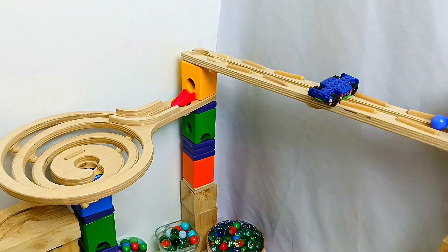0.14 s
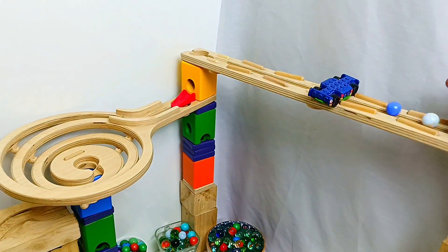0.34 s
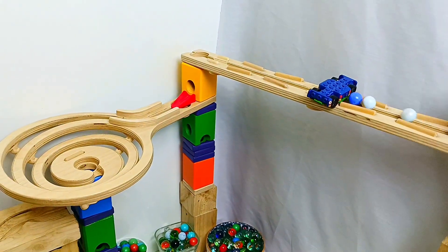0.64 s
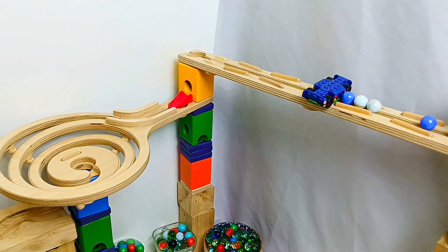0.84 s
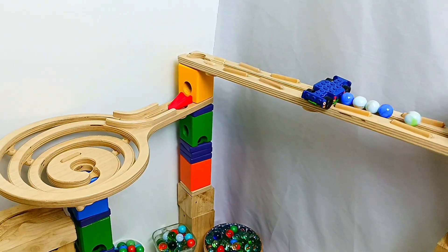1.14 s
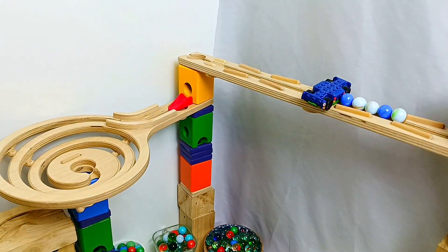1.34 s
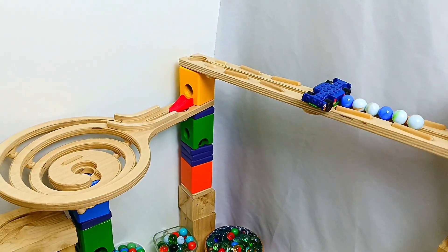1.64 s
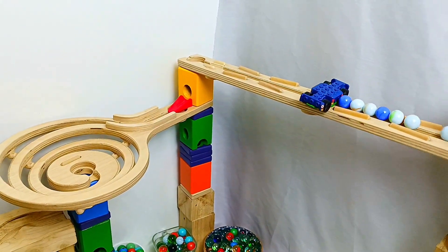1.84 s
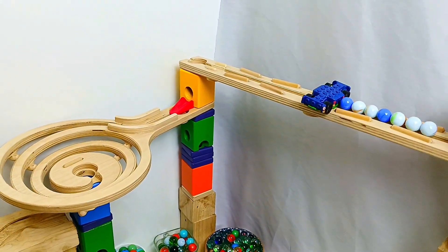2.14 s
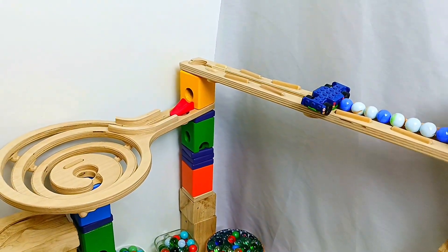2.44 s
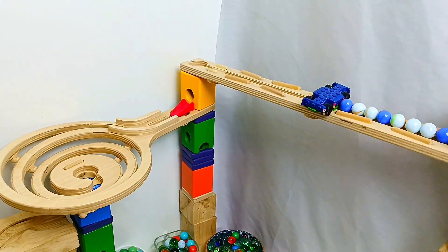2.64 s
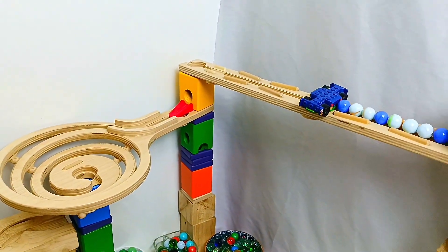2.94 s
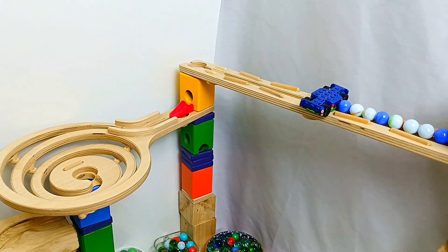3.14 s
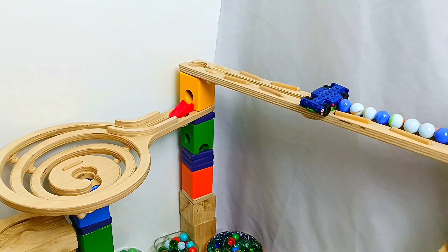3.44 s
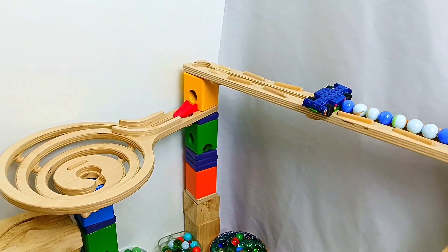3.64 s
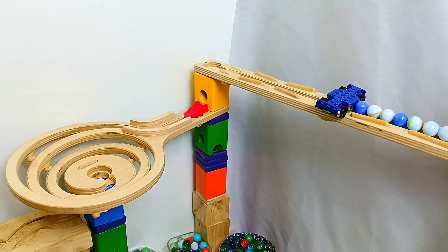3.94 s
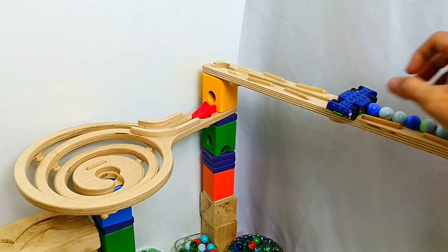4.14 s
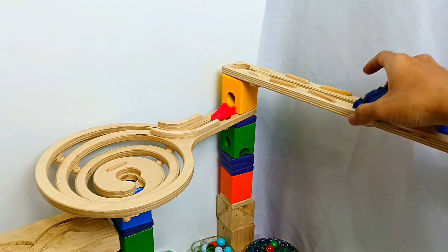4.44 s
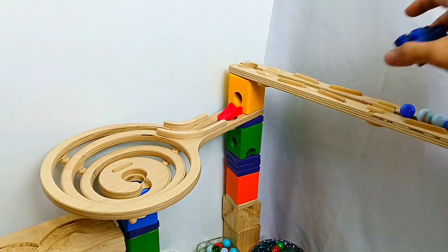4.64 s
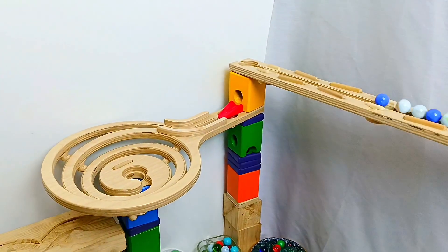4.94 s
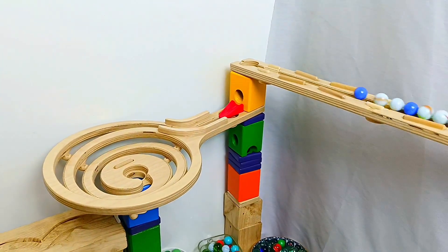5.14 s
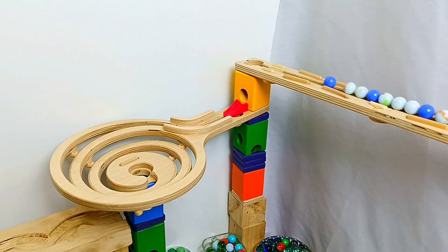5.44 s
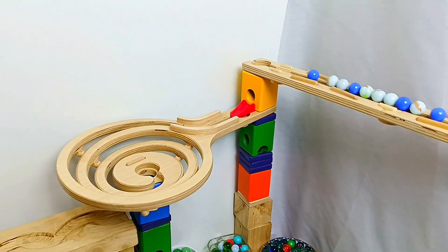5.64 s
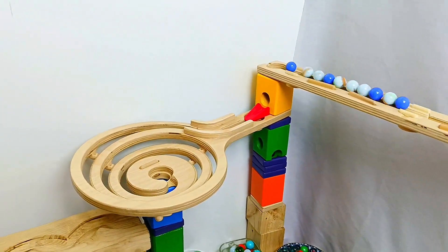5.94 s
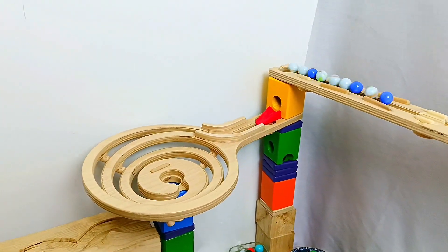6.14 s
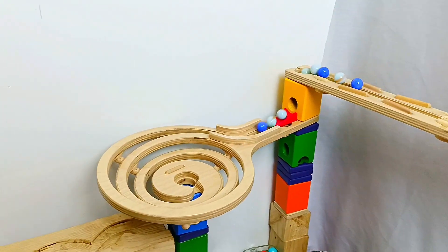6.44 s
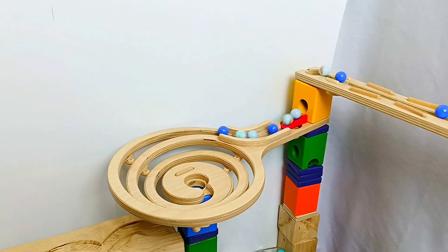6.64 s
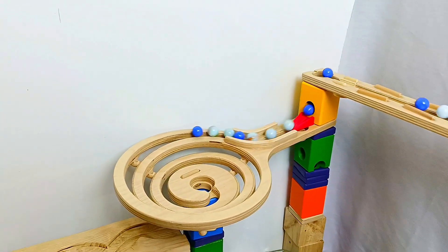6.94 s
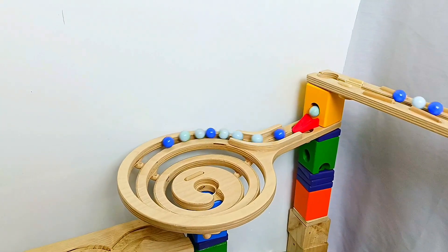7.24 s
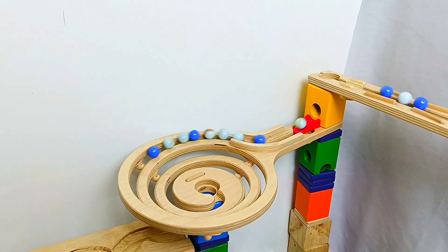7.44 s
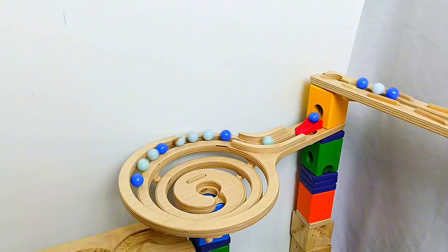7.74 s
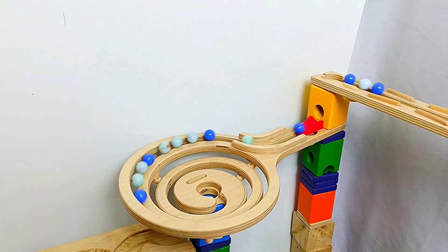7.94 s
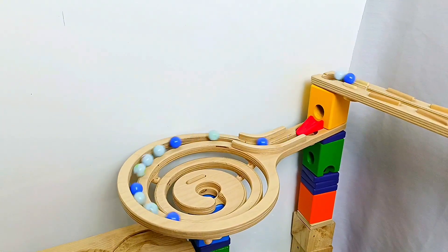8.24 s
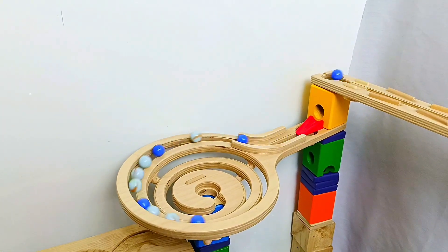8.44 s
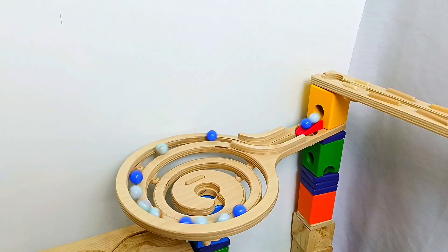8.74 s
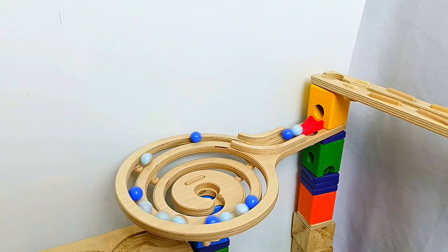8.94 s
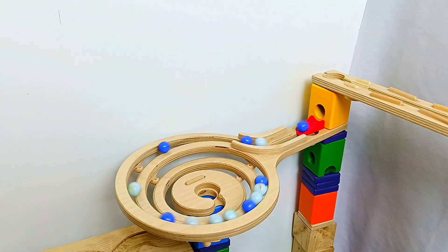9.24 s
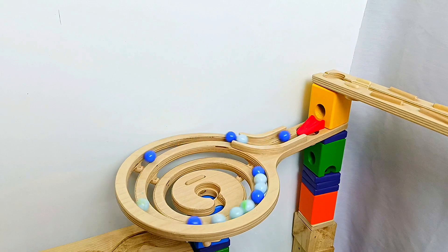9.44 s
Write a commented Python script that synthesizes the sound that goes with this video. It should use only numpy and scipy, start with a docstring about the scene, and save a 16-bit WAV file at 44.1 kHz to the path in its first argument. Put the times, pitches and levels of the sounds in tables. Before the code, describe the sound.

Marbles land, roll and clink together on wood, pause, tick away into a fast rattle, then slowed hollow knocks and a low rumbling roll.

```python
"""Marble run, real time and slow motion

A small room at two microphones, direct sound ahead of the echoes: glass marbles knock on a wooden track, roll
and click into a queue behind a toy car. Released, they tick over the seams and clatter down a plastic tower.
After a brief silence come slow, lower drops and a rumble round a wooden spiral, over a low beating hum.
Blows are noise cracks with damped rings; rolling is noise driven by tiny random bumps through resonances."""
import sys
import numpy as np
from scipy import signal
from scipy.fft import rfft, irfft, next_fast_len
from scipy.io import wavfile

SR = 44100
rng = np.random.default_rng(int(sys.argv[2]) if len(sys.argv) > 2 else 0)


def to_wav(s):
    """Save 16-bit WAV."""
    ch = np.atleast_2d(s).T  # columns
    pcm = np.round(np.clip(ch, -1, 1) * 32767)  # PCM
    wavfile.write(sys.argv[1], SR, pcm.astype(np.int16))


N = 423360
TIME = np.arange(N) / SR

# Levels of blows and rolling stand before the trim in each layer's function; ring pitches before random detuning.
# Positive left minus right means louder on the left.
CUT_S, RESUME_S, SLOW_SPEED = 6.606, 6.65, 0.42
TOP_HZ, SLOW_TOP_HZ = 16700, 6850
LEAD = 64  # samples ahead of each blow, trimmed off at the end
ATTACK_S = 0.0007  # blows multiply it by their speed

# Room air: (frequency [Hz], relative level per Hz [dB])
AIR = [(18, -53.5), (30, -13.5), (43, -26), (68, -12), (103, -6.5), (186, -22), (288, -19.5), (624, -22),
       (1930, -19.5), (3770, -35), (5690, -52), (14000, -49.5)]
AIR_DB = -65.5
# Hum, real time and slow motion: (time [s], level of the upper tone [dB])
HUM = [(0, -67), (1.4, -64), (2.6, -64), (2.95, -73.5), (3.8, -60.5), (5.3, -61), (5.7, -67.5),
       (6.6, -66.5)]
SLOW_HUM = [(6.65, -73.5), (7.25, -58), (9.6, -62)]
# Pitch and beat rate at normal speed; the lower tone is relative to the upper
HUM_HZ, BEAT_HZ, SECOND_TONE_DB = 100, 3.24, -3
BEAT_PEAK_S, SLOW_BEAT_PEAK_S = 3.82, 8.1  # moments when the two tones line up
# Room decay at normal speed: (frequency [Hz], time to fall 60 dB [s])
ROOM = [(300, 0.4), (800, 0.7), (2300, 0.7), (5500, 0.55), (9000, 0.43), (15000, 0.31)]

# A landed marble rolls off towards the queue: (start time [s], level [dB])
MARBLE_ROLLS = [(-0.08, -27.5), (1.02, -41), (1.47, -43), (2.1, -62), (2.32, -45), (2.82, -40.5),
                (3.2, -50.5), (3.76, -43)]
ROLL_RISE_S, ROLL_FADE_DB_PER_S = 0.05, 29.5
# Colour of rolling on the track: (frequency [Hz], relative level per Hz [dB])
TRACK = [(88, -45), (150, -35), (199, -20), (611, -5), (910, -32), (1000, -6.5), (1380, -3), (1840, -2.5),
         (2900, 2.5), (3570, -3), (5740, -25.5), (9400, -19), (10900, -34.5), (14000, -32.5)]
# Resonances of the straight track: (frequency [Hz], width [Hz], lift [dB])
RAILS = [(452, 17, 9), (598, 17, 7.5), (730, 33, 10.5), (1290, 36, 2), (1802, 37, 8.5), (2040, 130, 5.5),
         (2850, 330, 1), (3546, 170, 2), (4200, 150, 4)]

# Marbles land on the track: (time [s], level [dB], thud above that [dB], tick above that [dB],
# left minus right [dB], ring [Hz])
WOOD_KNOCKS = [(0.016, -32, -20, -8.5, -2, 2180), (0.114, -32.5, -14, -1, -0.5, 2400),
               (0.122, -23.5, -17.5, -9.5, -3.5, 2740), (0.161, -31, -18, -8, -0.5, 2540),
               (0.184, -34.5, -9, 1, -2, 2440), (0.2, -30.5, -13.5, -10, -4, 2620),
               (0.224, -39, -31, -2, -8, 2470), (0.288, -43.5, -6.5, -2, -2, 2780),
               (0.335, -33, -29, -19, -2, 2520), (0.361, -36.5, -12, 0, -1, 2290),
               (1.013, -39.5, -12.5, -7, -17, 2650), (1.023, -35.5, -7, -1, 0, 2480),
               (1.034, -30.5, -7, -5.5, -7.5, 2700), (1.436, -27, -17.5, -7, -7, 2810),
               (1.478, -33, -17.5, -14, 5, 2650), (2.042, -40, -13, -2, -9.5, 2560),
               (2.075, -37, -9, -21, -11.5, 2600), (2.099, -32, -18, -8, -9, 2400),
               (2.269, -27.5, -25, -10.5, -9.5, 2830), (2.296, -40, -7, -6, -11, 2740),
               (2.36, -41.5, -27, -21, 3, 2200), (2.804, -37.5, -2, -11.5, -9, 2340),
               (2.833, -35, -11, -13.5, -6, 2400), (3.019, -40.5, -1.5, -8, -3, 2620),
               (3.194, -44, -16, -35, 0, 2900), (3.22, -42, -15, -42, -9, 2150),
               (3.236, -39, -17, -41, -10, 2280), (3.702, -36.5, -4.5, -1, -19, 2850),
               (3.712, -38.5, -11, -10, 24, 2980), (3.759, -36.5, -11, -14, -6, 2920),
               (3.775, -35, -9.5, -6, 4, 2730), (3.816, -42.5, -7, -3.5, -2, 2340)]
# Colour of struck wood: (frequency [Hz], relative level per Hz [dB])
WOOD = [(120, -55.5), (250, -21), (450, -16.5), (900, -20.5), (1400, -5.5), (2250, -0.5), (3000, -2),
        (3900, -5), (5200, -9), (6500, -14.5), (9200, -8.5), (12000, -26.5), (16000, -26)]
# Low flexing of the struck board at normal speed: (frequency [Hz], relative level per Hz [dB])
BOARD = [(100, -45), (230, -7.5), (450, 0), (700, -1), (1000, -6.5), (2500, -50), (8000, -79.5)]
# Marble meets marble in the queue: (time [s], level [dB], tick above that [dB], left minus right [dB])
GLASS_CLICKS = [(0.659, -33.5, -0.5, -6), (0.783, -52, 16.5, -2), (0.808, -40, 1.5, 4),
                (0.96, -39.5, 2, -10), (1.25, -35, 2, -9.5), (1.362, -33.5, 1.5, -16), (1.752, -34, 6, -4),
                (1.97, -46, 12, -5.5), (2.154, -35.5, 3, -12), (2.458, -36, 6.5, -6), (2.701, -42, 12, -4),
                (2.975, -40, 8, -15), (3.258, -39.5, 8.5, -14), (3.436, -45.5, 12.5, -5)]
# Colour of glass on glass: (frequency [Hz], relative level per Hz [dB])
GLASS = [(400, -32), (1700, -10.5), (2600, -3), (3300, 0), (6300, -10), (8300, 5), (10000, -0.5),
         (13000, -10), (15500, -2)]
# Rings that all blows of a kind share
GLASS_RING_HZ, WOOD_RING_HZ, SLOW_RINGS_HZ = 2600, 3717, (3194, 4080)

# Soft low thumps: (time [s], level [dB])
THUMPS = [(2.24, -57), (3.85, -60), (5.17, -52)]
# Colour of the thumps: (frequency [Hz], relative level per Hz [dB])
THUMP_COLOUR = [(20, -10), (45, -6), (70, 3), (130, -14.5), (300, -47), (1000, -81)]

# The released queue rolls over the joints: (time [s], level [dB], tick above that [dB], ring [Hz])
SEAM_TICKS = [(4.537, -59.5, -7.5, 4200), (4.941, -57.5, -21, 4090), (5.154, -55, -23, 3000),
              (5.297, -51.5, -21, 3450), (5.395, -50.5, -26, 3440), (5.488, -48.5, -11, 3190),
              (5.588, -56, -11, 3600), (5.666, -46.5, -13, 3520), (5.752, -48.5, -17, 3200),
              (5.834, -47, -16, 3560), (5.933, -51, -5, 3450), (5.962, -42, -19, 3450),
              (6.09, -46.5, -28, 4020)]
# Colour of the seam ticks: (frequency [Hz], relative level per Hz [dB])
SEAM = [(180, -31.5), (300, -27), (630, -16), (950, -17.5), (1800, -19.5), (2500, -7), (3500, -1.5),
        (4500, -9), (6000, -13.5), (9400, -6.5), (12500, -39.5), (16000, -38)]
# The released queue gathers speed: (time [s], level [dB])
QUEUE_ROLL = [(4.6, -83), (5.2, -75), (5.66, -50), (6.1, -51), (6.38, -44.5), (6.6, -37)]
# The board booms under the whole queue: (frequency [Hz], width [Hz], lift [dB])
LOADED_BOARD = (670, 130, 5)

# Marbles fall through the plastic block: (time [s], level [dB], tick above that [dB],
# low ring [Hz], high ring [Hz])
TOWER_DROPS = [(6.21, -30, -8, 2520, 7240), (6.243, -40.5, -14.5, 2650, 7300),
               (6.321, -35, 0.5, 2920, 7450), (6.336, -31, -8, 1910, 7360), (6.401, -30, -3.5, 2750, 8600),
               (6.445, -32, 2, 3220, 9950), (6.46, -28.5, -3, 3030, 5600), (6.503, -30, -2, 3080, 9500),
               (6.522, -25.5, -5, 2800, 7700), (6.55, -38, -2, 2730, 9400), (6.574, -31, -4, 3570, 8340),
               (6.588, -30.5, -3, 2960, 7650), (6.595, -26, -25, 3280, 8790)]
# Colour of the plastic tower: (frequency [Hz], relative level per Hz [dB])
TOWER = [(150, -59), (250, -27.5), (651, -25), (723, -9.5), (938, -11), (1220, -1), (1470, -9), (2810, -2),
         (6360, -11.5), (8120, -8), (13200, -20), (16000, -19)]

# Rolling round the spiral: (time [s], level [dB])
SPIRAL_ROLL = [(6.66, -29), (6.85, -30.5), (7.19, -30.5), (8.3, -43), (8.56, -45), (8.71, -35.5),
               (8.89, -33), (9.27, -43), (9.6, -42)]
# Colour of rolling in the spiral: (frequency [Hz], relative level per Hz [dB])
SPIRAL = [(40, -34.5), (90, -0.5), (200, -6), (400, 3), (750, 7), (1250, 9), (1700, -5), (2400, -11.5),
          (3200, -14), (4250, -20.5), (4900, -34.5), (6800, -42), (9000, -56.5)]
# Resonances of the spiral dish in slow motion: (frequency [Hz], width [Hz], lift [dB])
DISH = [(307.6, 33, 10.5), (444, 22, 1), (635.4, 37, 11), (775, 49, 6), (1180, 26, -8), (1307, 27, 4.5),
        (1470, 48, 12), (2040, 88, 11), (2660, 130, -0.5), (3714, 35, -10)]
# Tower and spiral in slow motion: (time [s], level [dB], thud above that [dB], tick above that [dB], ring [Hz])
SLOW_DROPS = [(6.652, -34.5, -6, -7.5, 1090), (6.663, -29, -6.5, -7, 1080),
              (6.681, -29.5, -4.5, -9.5, 1046), (6.709, -29, -7, -1, 1186), (6.772, -29, -16, 0, 1310),
              (6.827, -25, -11, -5, 1155), (6.85, -25, -14, -5, 1105), (6.857, -27.5, -3.5, 0.5, 1110),
              (6.886, -28.5, -6.5, -11, 1322), (7.051, -25, -15.5, -3.5, 1223),
              (7.078, -23.5, -9, -18, 1133), (7.096, -22.5, -22, -5.5, 1118), (7.165, -35, -8, -4, 1290),
              (7.217, -33, -1, -8, 990), (7.275, -34.5, -2.5, 4.5, 1094), (7.332, -24.5, -9, -2.5, 1218),
              (7.371, -30.5, -5, -2, 1100), (7.473, -37, 2, -4.5, 1300), (7.611, -27, -6, -7, 1074),
              (8.075, -28.5, -11, -4.5, 1183), (8.503, -28.5, -24.5, -15, 1260),
              (8.561, -31.5, -7, -13.5, 950), (8.595, -31, -8.5, -15, 1122), (8.628, -35, -12, -20, 1040),
              (8.679, -22.5, -22, -10.5, 1324), (8.727, -23, -34, -9.5, 1240), (8.779, -37, -6, -14, 1540),
              (8.804, -22, -24.5, -9.5, 1220), (8.852, -22, -18, -12.5, 1302), (8.895, -33, -9, 0, 1210),
              (8.992, -25, -24, -6.5, 1410), (9.067, -23, -31, -6, 1060), (9.111, -32, -20, -14, 1210),
              (9.44, -28.5, -23.5, -7, 1048)]
# Colour of the slowed drops: (frequency [Hz], relative level per Hz [dB])
SLOW = [(60, -35.5), (200, -22.5), (450, -7.5), (750, -7), (1150, 0), (1700, -0.5), (2400, -8.5),
        (3300, -10), (4200, -14), (5300, -20), (6600, -17.5), (9000, -60.5)]
# Resonances that every slowed drop wakes: (frequency [Hz], width [Hz], lift [dB])
SLOW_MODES = [(1258, 23, 1.5), (2787, 180, 8), (3720, 130, 10), (5550, 43, 3), (6270, 210, 2)]
# Marbles jostle after each drop into the spiral
JOSTLE_RISE_S, JOSTLE_FADE_DB_PER_S = 0.025, 72
# A dull bump in slow motion: (time [s], level [dB], decay [s])
BUMP = (7.907, -31, 0.11)
# Colour of the bump: (frequency [Hz], relative level per Hz [dB])
BUMP_COLOUR = [(60, -15.5), (150, -1.5), (380, 3), (700, -3.5), (1400, -15.5), (2200, -49), (5500, -43.5),
               (6800, -33)]
# A marble falling alone makes the plastic block ping: (time [s], level [dB], pitch [Hz])
BLOCK_PINGS = [(8.503, -29.5, 3156), (8.596, -22.5, 2870), (8.68, -24.5, 3130), (8.727, -26, 2620),
               (8.779, -31, 2920), (8.853, -23.5, 2000)]
# Partials of that ping: (multiple of the pitch, level [dB], decay [s])
PING_PARTIALS = [(0.791, -6.5, 0.012), (1, -0.5, 0.007), (1.1, -1, 0.007), (1.859, -23, 0.0068)]


def undb(db):
    """Decibels to gain."""
    return 10 ** (np.asarray(db) / 20)


def unit(x):
    """Scale to rms 1."""
    return x / np.sqrt(np.mean(x ** 2) + 1e-20)


def freqs(x):
    """Frequency of each spectral bin of x, at least 1 Hz."""
    return np.maximum(np.fft.rfftfreq(x.shape[-1], 1 / SR), 1)


def shape(x, gain):
    """Filter by one gain per bin."""
    return irfft(rfft(x) * gain, x.shape[-1])


def over_hz(points, f):
    """Read (frequency [Hz], value) points on a log-frequency axis."""
    hz, value = np.transpose(points)
    return np.interp(np.log(f), np.log(hz), value)


def colour(x, points, modes=()):
    """Give x a broad spectrum, lifted at narrow resonances."""
    f = freqs(x)
    lift = sum(db / (1 + (2 * (f - hz) / width) ** 2) for hz, width, db in modes)
    return shape(x, undb(over_hz(points, f) + lift))


def fader(curve):
    """Gain over time from (time [s], level [dB]) rows."""
    return undb(np.interp(TIME, *np.transpose(curve)))


def swells(starts, rise_s, fade_db_per_s):
    """Level over time as (time [s], level [dB]): every (start, level) swells quickly and dies away."""
    t = TIME[::200]
    s, db = np.transpose(starts)[:2, :, None]
    age = np.maximum(t - s, 0)
    gain = undb(db - fade_db_per_s * age) * (1 - np.exp(-age / rise_s))
    return np.c_[t, 10 * np.log10(np.sum(gain ** 2, axis=0) + 1e-12)]


def sides(pan_db):
    """Left and right gains of constant power."""
    return unit(undb(np.array([[pan_db], [-pan_db]]) / 2))


def stereo_noise(size, likeness, lag=0):
    """Noise at two microphones: a shared part, later on the left by lag samples, and a part of their own."""
    shared, *own = rng.standard_normal((3, size))
    likeness = np.clip(likeness, 0, 1)
    both = np.array([np.roll(shared, lag), shared])
    return np.sqrt(likeness) * both + np.sqrt(1 - likeness) * np.array(own)


def low_pass(x, hz):
    """Steep cut of the top."""
    return signal.sosfilt(signal.ellip(10, 0.2, 75, hz, fs=SR, output="sos"), x)


def air():
    """Steady room air: nearly independent coloured noise at each microphone."""
    return undb(AIR_DB) * unit(colour(stereo_noise(N, likeness=0.04), AIR))


def hum(peak_s, speed):
    """Mains hum and a slightly lower tone beat against each other."""
    turn = 2 * np.pi * speed * (TIME - peak_s)
    tones = np.sin(HUM_HZ * turn) + undb(SECOND_TONE_DB) * np.sin((HUM_HZ - BEAT_HZ) * turn)
    return np.sqrt(2) * tones * sides(pan_db=-4.5)


def random_bumps(per_s, spread_db, most, decay_s):
    """Contact strength under randomly timed, uneven bumps whose power decays exponentially."""
    strength = undb(spread_db * np.minimum(rng.exponential(size=N), most))
    bumps = (rng.random(N) < per_s / SR) * strength
    return np.sqrt(signal.lfilter([1], [1, -np.exp(-2 / (decay_s * SR))], bumps ** 2))


def rolling(curve, spectrum, modes, bumps_per_s, spread_db, bump_s, smooth_db, sway_db, likeness):
    """Tiny uneven bumps of the wood grain shake the track, whose resonances swell and fade at random."""
    contact = unit(random_bumps(bumps_per_s, spread_db, most=4, decay_s=bump_s)) + undb(smooth_db)
    wood = colour(contact * stereo_noise(N, likeness, lag=6), spectrum)
    out = wood
    for hz, width, db in modes:
        places = np.linspace(0, TIME[-1], 60)
        sway = fader(np.c_[places, sway_db * rng.standard_normal(len(places))])
        resonance = signal.lfilter(*signal.iirpeak(hz, hz / width, fs=SR), wood)
        out = out + (undb(db) - 1) * sway * resonance
    return unit(out) * fader(curve)


def marble_rolls():
    """Each landed marble rolls away along the track, exciting its resonances as it fades."""
    curve = swells(MARBLE_ROLLS, ROLL_RISE_S, ROLL_FADE_DB_PER_S)
    return undb(-5.5) * rolling(curve, TRACK, RAILS, bumps_per_s=300, spread_db=3.0, bump_s=0.0039,
                                smooth_db=3.5, sway_db=4.0, likeness=0.17)


def early_reflections(f, depth_db):
    """Early reflections comb each blow: random peaks and gaps a few hundred Hz apart, new for each blow."""
    grid = np.arange(0, 20000, 380)
    return undb(depth_db * np.interp(f, grid, rng.standard_normal(len(grid))))


def repeats(s, db, thud_db, tick_db, pan_db, rings_hz, detune, gap_s, loss_db, dull_db, drift_db, count):
    """Each blow is heard again shortly after, weaker, duller and further left; chance detunes the rings."""
    rows = []
    for k in range(count):
        chance = rng.standard_normal((len(s), 1 + len(rings_hz))).T
        late_s = k * gap_s * (1 + 0.15 * chance[0])
        rings = [hz * (1 + detune * c) for hz, c in zip(rings_hz, chance[1:])]
        columns = np.broadcast_arrays(s + late_s, db + k * loss_db, thud_db + k * dull_db, tick_db,
                                      pan_db + k * drift_db, *rings)
        rows.append(np.column_stack(columns))
    return np.vstack(rows)


def blows(table, spectrum, decay_s, ring_db, ring_s, lift_db, width_hz, body_db, body_s, board_db, board_s,
          likeness, speed=1, modes=()):
    """Each blow is a short crack with damped rings, a shudder of the struck body and a low flex of the board."""
    size, head = next_fast_len(int(6000 / speed)), int(0.008 * SR / speed)
    t = np.maximum(np.arange(size) - LEAD, 0) / SR
    f = freqs(t) / speed
    thud = 1 / (1 + (f / 1700) ** 6)
    tick = 1 - 1 / (1 + (f / 5500) ** 6)
    crack_and_body = np.exp(-t / decay_s) + undb(body_db) * np.exp(-t / body_s)
    envelope = (1 - np.exp(-t / speed / ATTACK_S)) * crack_and_body
    ring_envelope = (1 - np.exp(-t / speed / 0.0011)) * np.exp(-t / ring_s)
    board_envelope = (1 - np.exp(-t / speed / 0.0057)) * np.exp(-t / board_s)
    out = np.zeros((2, N + 2 * size))
    for s, db, thud_db, tick_db, pan_db, *rings_hz in table:
        # early reflections roughen the colour of each blow at random
        noise = stereo_noise(size, likeness, lag=rng.integers(3, 9))
        noise = shape(noise, early_reflections(f, depth_db=4))
        ring_modes = [(hz, width_hz, lift_db) for hz in rings_hz]
        hit = envelope * unit(colour(noise, spectrum, [*modes, *ring_modes]))
        for hz in rings_hz:
            slope_db = over_hz(spectrum, hz) - over_hz(spectrum, rings_hz[0])
            phase = rng.random() + 0.081 * rng.standard_normal((2, 1))  # in turns
            hit = hit + undb(ring_db + slope_db) * ring_envelope * np.sin(2 * np.pi * (hz * t + phase))
        hit = hit * sides(pan_db)
        board = board_envelope * unit(shape(stereo_noise(size, likeness), undb(over_hz(BOARD, f))))
        sound = undb(db + thud_db + board_db) * board
        # the hardness of the contact sets the share of thud and tick
        for band, band_db in ((thud, thud_db), (1 - thud - tick, 0), (tick, tick_db)):
            part = shape(hit, band)
            head_rms = np.sqrt(np.mean(part[:, LEAD:LEAD + head] ** 2))
            sound = sound + part * undb(db + band_db) / head_rms
        start = int(max(s, 0) * SR)
        out[:, start:start + size] += sound
    return out[:, LEAD:LEAD + N]


def wood_knocks():
    """A marble lands on the track and hops: wood noise with two rings and a flex of the board."""
    s, db, thud_db, tick_db, pan_db, hz = np.transpose(WOOD_KNOCKS)
    hits = repeats(s, db, thud_db, tick_db, pan_db, rings_hz=[hz, WOOD_RING_HZ], detune=0.019,
                   gap_s=0.0105, loss_db=-9, dull_db=6, drift_db=6.5, count=2)
    return undb(0.77) * blows(hits, WOOD, decay_s=0.0065, ring_db=-3, ring_s=0.0031, lift_db=8.5, width_hz=520,
                              body_db=-10.5, body_s=0.01, board_db=-12.5, board_s=0.047, likeness=0.26)


def room(x, speed, build_s):
    """Diffuse echoes of a small room; the treble dies first."""
    t = np.arange(int(SR / speed)) / SR * speed
    noise = rng.standard_normal((2, len(t)))
    centres, t60s = np.transpose(ROOM)
    tail = 0
    for weights, t60 in zip(np.eye(len(ROOM)), t60s):
        band = shape(noise, over_hz(np.c_[centres, weights], freqs(t) / speed))
        tail = tail + band * np.exp(-np.log(1000) * t / t60)
    tail = unit(tail * (1 - np.exp(-t / build_s))) / np.sqrt(len(t))
    return signal.fftconvolve(x, tail, axes=1)[:, :N]


def glass_clicks():
    """A marble hits the queue, and a weaker, duller wall reflection follows about 11 ms later, further left."""
    s, db, tick_db, pan_db = np.transpose(GLASS_CLICKS)
    hits = repeats(s, db, thud_db=-18.5, tick_db=tick_db, pan_db=pan_db, rings_hz=[GLASS_RING_HZ], detune=0.018,
                   gap_s=0.0113, loss_db=-9, dull_db=4.5, drift_db=16, count=2)
    return undb(-1.2) * blows(hits, GLASS, decay_s=0.0027, ring_db=-1.5, ring_s=0.0035, lift_db=15, width_hz=360,
                              body_db=-32.5, body_s=0.0056, board_db=-19.0, board_s=0.02, likeness=0.13)


def thumps():
    """A few soft, deep thumps: low noise, nearly alike at both microphones."""
    curve = swells(THUMPS, rise_s=0.01, fade_db_per_s=112)
    return unit(colour(stereo_noise(N, likeness=0.8), THUMP_COLOUR)) * fader(curve)


def seam_ticks():
    """A marble dips into a joint and meets its far edge, waking the resonances of the track."""
    s, db, tick_db, hz = np.transpose(SEAM_TICKS)
    hits = repeats(s, db, thud_db=-13.5, tick_db=tick_db, pan_db=-3, rings_hz=[hz], detune=0.02,
                   gap_s=0.011, loss_db=-8, dull_db=9, drift_db=5.5, count=2)
    return undb(0.4) * blows(hits, SEAM, decay_s=0.0077, ring_db=-2.5, ring_s=0.007, lift_db=4.0, width_hz=400,
                             body_db=-6.5, body_s=0.026, board_db=-12.5, board_s=0.024, likeness=0.096,
                             modes=RAILS)


def queue_roll():
    """The released queue rolls along the track, with the boom of the loaded board."""
    return undb(-4) * rolling(QUEUE_ROLL, TRACK, [*RAILS, LOADED_BOARD], bumps_per_s=240, spread_db=3.0,
                              bump_s=0.0039, smooth_db=9.0, sway_db=6.8, likeness=0.17)


def tower_drops():
    """A marble rattles between the walls of the plastic block: three quick contacts with two rings each."""
    s, db, tick_db, low_hz, high_hz = np.transpose(TOWER_DROPS)
    hits = repeats(s, db, thud_db=-13, tick_db=tick_db, pan_db=-7, rings_hz=[low_hz, high_hz], detune=0.011,
                   gap_s=0.0064, loss_db=-5.0, dull_db=6.5, drift_db=8.5, count=3)
    return undb(-1.26) * blows(hits, TOWER, decay_s=0.003, ring_db=-4.5, ring_s=0.0046, lift_db=9.5,
                               width_hz=2800, body_db=-18.0, body_s=0.011, board_db=-15.0, board_s=0.02,
                               likeness=0.14)


def spiral_roll():
    """Marbles rumble round the wooden spiral, its dish resonating low in slow motion."""
    return undb(-2.0) * rolling(SPIRAL_ROLL, SPIRAL, DISH, bumps_per_s=130, spread_db=6.0, bump_s=0.019,
                                smooth_db=-3.0, sway_db=2.0, likeness=0.19)


def slow_drops():
    """Drops through tower and spiral in slow motion: lower cracks and rings that last longer."""
    s, db, thud_db, tick_db, hz = np.transpose(SLOW_DROPS)
    hits = repeats(s, db, thud_db, tick_db, pan_db=-3, rings_hz=[hz, *SLOW_RINGS_HZ], detune=0.017,
                   gap_s=0.0167, loss_db=-13, dull_db=7, drift_db=3, count=2)
    return undb(-1.5) * blows(hits, SLOW, decay_s=0.0074, ring_db=-4, ring_s=0.012, lift_db=10, width_hz=240,
                              body_db=-6, body_s=0.023, board_db=-19.5, board_s=0.12, likeness=0.41,
                              speed=SLOW_SPEED, modes=SLOW_MODES)


def jostle():
    """Marbles entering the spiral close together nudge each other and the rim: random bursts after each drop."""
    contact = random_bumps(per_s=70, spread_db=4.5, most=2.5, decay_s=0.004)
    nudges = unit(colour(contact * stereo_noise(N, likeness=0.097), SLOW, SLOW_MODES))
    return undb(-20) * nudges * fader(swells(SLOW_DROPS, JOSTLE_RISE_S, JOSTLE_FADE_DB_PER_S))


def bump():
    """A soft, heavy contact: one decaying burst of dull noise."""
    s, db, decay_s = BUMP
    t = np.maximum(TIME - s, 0)
    envelope = (1 - np.exp(-t / 0.0025)) * np.exp(-t / decay_s)
    return undb(db) * envelope * unit(colour(stereo_noise(N, likeness=0.27), BUMP_COLOUR))


def block_pings():
    """A few short, clear partials of the hollow block."""
    t = np.arange(SR // 8) / SR
    out = np.zeros((2, N))
    for s, db, hz in BLOCK_PINGS:
        start = int(s * SR)
        for multiple, partial_db, decay_s in PING_PARTIALS:
            phase = rng.random() + 0.087 * rng.standard_normal((2, 1))  # in turns
            envelope = (1 - np.exp(-t / ATTACK_S)) * np.exp(-t / decay_s)
            tone = np.sin(2 * np.pi * (multiple * hz * t + phase))
            out[:, start:start + len(t)] += undb(db + partial_db) * envelope * tone
    return out


def real_time():
    """The queue builds up, is released and reaches the tower."""
    wood, glass, seams, tower = wood_knocks(), glass_clicks(), seam_ticks(), tower_drops()
    to_room = undb(-5.5) * wood + undb(-7) * glass + undb(-8) * seams + undb(-1.5) * tower
    echoes = room(to_room, speed=1, build_s=0.0044)
    background = air() + fader(HUM) * hum(BEAT_PEAK_S, speed=1) + thumps()
    return background + marble_rolls() + wood + glass + seams + queue_roll() + tower + echoes


def slow_motion():
    """Drops and the spiral's rumble, with hum and room slowed along with them."""
    drops = slow_drops() + block_pings()
    echoes = room(undb(-7.5) * drops, speed=SLOW_SPEED, build_s=0.0033)
    slow_hum = fader(SLOW_HUM) * hum(SLOW_BEAT_PEAK_S, speed=SLOW_SPEED)
    return slow_hum + spiral_roll() + drops + jostle() + bump() + echoes


def scene():
    """Real time, a moment of silence, then slow motion with its top lowered in proportion."""
    before = np.clip((CUT_S - TIME) / 0.003 + 0.5, 0, 1)
    after = np.clip((TIME - RESUME_S) / 0.003, 0, 1)
    return before * real_time() + low_pass(after * slow_motion(), SLOW_TOP_HZ)


def record(dry):
    """The recorder cuts the top."""
    return low_pass(dry, TOP_HZ)


dry = scene()
out = record(dry)
to_wav(out)
```